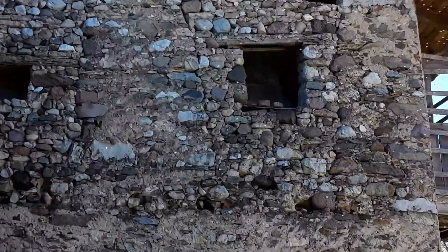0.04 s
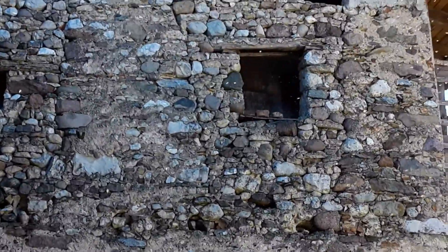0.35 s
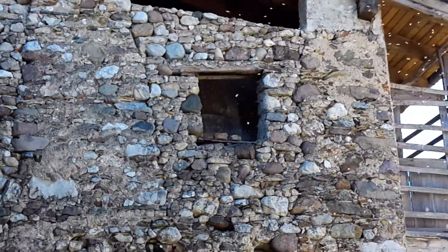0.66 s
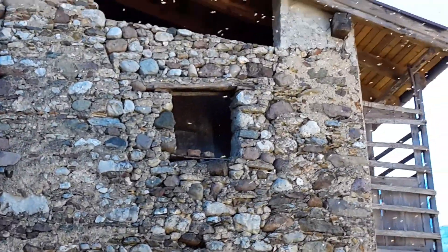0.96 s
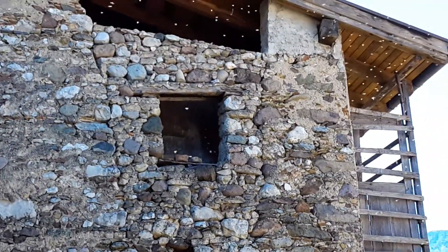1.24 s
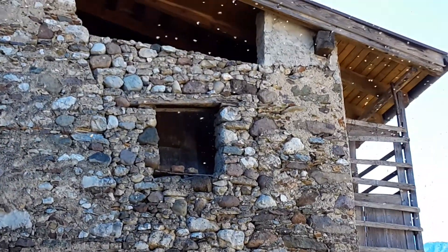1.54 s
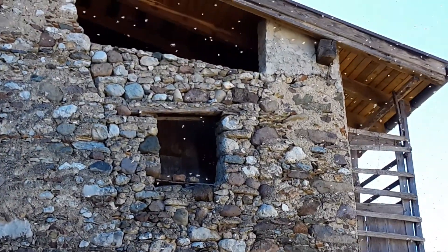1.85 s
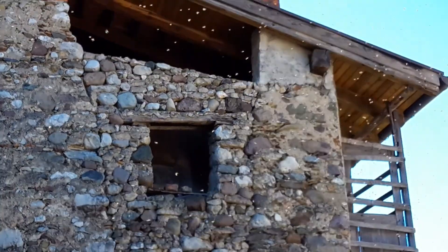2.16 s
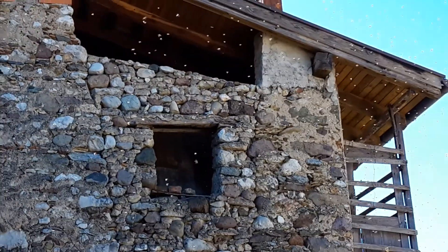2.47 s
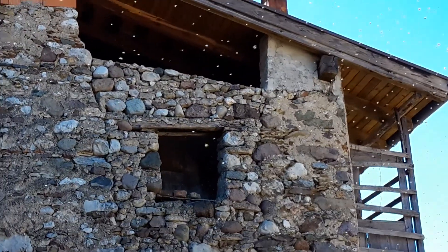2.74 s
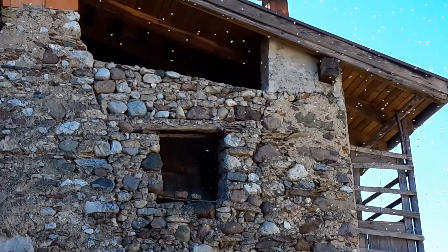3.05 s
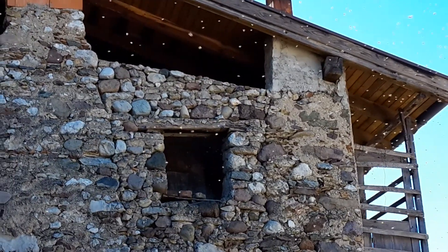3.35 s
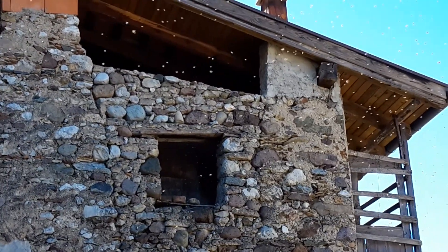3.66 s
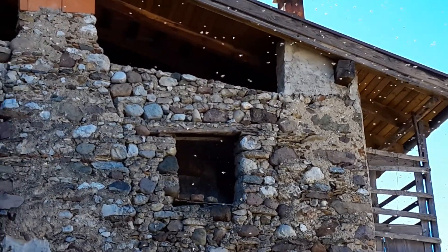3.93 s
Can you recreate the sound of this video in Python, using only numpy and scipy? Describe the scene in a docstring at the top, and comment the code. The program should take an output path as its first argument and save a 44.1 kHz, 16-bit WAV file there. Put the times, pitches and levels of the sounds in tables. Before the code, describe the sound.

Bees hum faintly throughout, mostly right, under steady outdoor hiss. Wind flutters and bumps on the microphone's left side until about 1.5 seconds, hardest near 0.5. Light handling knocks and dull rubs come around 2.1, 2.8 and 3.9 seconds, with sharp clicks on the right near 2.8 and 3.8. A faint distant tone sounds briefly at 2.4. One bee buzzes nearer, peaking around 3 seconds. Wind returns at the end.

```python
"""A swarm of bees hums under steady outdoor hiss, some way off and mostly to the right.
Their beating wings make the hum, under the eaves of a stone barn; late on, one bee drifts nearer.
Wind flutters and bumps on the left microphone port. Handling adds light knocks, dull rubs and a few
sharp clicks in the right port; the microphone's bass cut shapes bumps and handling alike.
Past the middle, a faint tone sounds briefly far off."""
import sys
import numpy as np
from scipy import signal
from scipy.fft import rfft, irfft
from scipy.io import wavfile
from scipy.ndimage import uniform_filter1d

SR = 44100
rng = np.random.default_rng(int(sys.argv[2]) if len(sys.argv) > 2 else 0)


def digitize_waveform(pressure):
    """Quantize a signal to 16-bit integers and store it at the path in sys.argv[1].

    Rows of a 2-D input are taken as channels; values are limited to [-1, 1].
    """
    field = np.atleast_2d(pressure).T
    bounded = np.clip(field, -1, 1)
    quanta = np.round(bounded * 32767).astype(np.int16)
    wavfile.write(sys.argv[1], SR, quanta)


N = 176400
TIME = np.arange(N) / SR


def undb(db):
    """Decibels to gain."""
    return 10 ** (np.asarray(db) / 20)


def curve(rows, column=1):
    """One column of a table, joined by straight lines in time."""
    rows = np.array(rows)
    return np.interp(TIME, rows[:, 0], rows[:, column])


def unit(x):
    """Scale to rms 1."""
    return x / np.std(x)


def cut(x, hz, kind, order=2):
    """Smooth low-, high- or band-pass."""
    return signal.sosfilt(signal.butter(order, hz, kind, fs=SR, output="sos"), x)


def drift(rate_hz):
    """Smooth random drift with spread 1."""
    steps = rng.standard_normal(400)
    hop = int(SR / rate_hz)
    ramps = np.interp(np.arange(N) / hop, np.arange(len(steps)), steps)
    return unit(uniform_filter1d(ramps, hop // 2 + 1))


def swell(at, width):
    """A bell-shaped rise and fall; width is its standard deviation in seconds."""
    return np.exp(-.5 * np.minimum(((TIME - at) / width) ** 2, 100))


def noise(spectrum):
    """Noise with a given density per Hz."""
    hz, db = np.array(spectrum).T
    bins_hz = np.maximum(np.arange(N // 2 + 1) * SR / N, 1)
    density = undb(np.interp(np.log(bins_hz), np.log(hz), db))
    return irfft(rfft(rng.standard_normal(N)) * density, N) * np.sqrt(SR / 2)


def bass_cut(pressure, corner_hz=94.3):
    """The microphone's bass cut turns a push into a short swing."""
    return cut(pressure, corner_hz, "high", order=3)


def pan(x, left_db=0, right_db=0):
    """Place a sound in stereo with a gain for each side."""
    return undb([[left_db], [right_db]]) * x


def wings(hz, harmonics_db):
    """One pair of wings repeats the same stroke at the beat rate, making a buzz."""
    cycle = np.linspace(0, 1, 513)
    stroke = sum(undb(db) * np.sin(2 * np.pi * (k * cycle + rng.random()))
                 for k, db in enumerate(harmonics_db, 1))
    return np.interp(np.cumsum(hz) / SR % 1, cycle, unit(stroke))


# Tone of a wingbeat, harmonics from the first up: level/dB
SWARM_HARMONICS = [-0.5, -4.5, -14, -13, -10.5, -25, -41.5, -21.5, -20, -37]
# Fader ride of the swarm: t/s, level/dB
SWARM_LEVEL = [(0, -59.5), (.6, -57), (1.2, -57), (1.6, -60.5), (2.2, -59.5), (2.8, -60), (3.3, -61),
               (4, -57)]


def swarm(count=24, wingbeat_hz=236.2, spread=.062, wander=.028, jitter=.014, swell_db=5.5):
    """Many bees blur into a hum, each with its own wandering pitch and loudness."""
    hum = 0
    for offset in unit(np.sinh(2 * np.linspace(-1, 1, count))):
        hz = wingbeat_hz * (1 + spread * offset + wander * drift(6) + jitter * drift(40))
        hum += wings(hz, SWARM_HARMONICS) * undb(swell_db * drift(6))
    return unit(hum) * undb(curve(SWARM_LEVEL))


# Flight of the nearer bee: t/s, wingbeat f/Hz, level/dB
NEAR_FLIGHT = [(0, 250, -75.5), (2.2, 240.3, -75), (2.5, 244, -64), (2.68, 247.9, -57.5),
               (2.8, 255.9, -55.5), (2.97, 249, -51.5), (3.12, 234.4, -64), (3.3, 251.7, -58),
               (3.45, 244, -65), (3.62, 238.4, -63), (4, 243, -59)]
# Tone of its wingbeat, harmonics from the first up: level/dB
NEAR_HARMONICS = [1.5, -7, -16.5, -21, -17, -22]


def near_bee(waver=.01, flutter_db=2.2):
    """One bee's wavering buzz rises out of the swarm as it drifts nearer."""
    hz = curve(NEAR_FLIGHT) * (1 + waver * drift(30))
    buzz = wings(hz, NEAR_HARMONICS)
    return buzz * undb(curve(NEAR_FLIGHT, column=2) + flutter_db * drift(8.4))


# Colour of the hiss at each port: f/Hz, density/dB per Hz
HISS_LEFT = [(30, -100), (200, -95), (340, -99.5), (850, -101.5), (2300, -105), (4500, -109), (6800, -115),
             (8700, -114.5), (10600, -109), (13000, -106.5), (16000, -106)]
HISS_RIGHT = [(25, -106), (60, -87), (120, -90), (190, -91.5), (400, -94.5), (850, -100), (1200, -99),
              (1600, -102), (3200, -105.5), (7000, -110), (8500, -105.5), (9500, -99), (10200, -92.5),
              (11000, -93), (12300, -99.5), (15500, -104.5)]
# Fader ride of the hiss: t/s, gain/dB
HISS_GAIN = [(0, 1.9), (.32, 0), (.47, 3), (.7, 4), (.92, 1.1), (1.03, 3.5), (1.17, 3.5), (1.35, 0.5),
             (1.47, 2), (1.65, 0), (2.5, -0.24), (2.9, 1.4), (3.2, 0.25), (3.78, -0.6), (3.88, 2.5), (4, 1)]


def hiss():
    """A bed of outdoor hiss, unrelated at the two ports and brighter on the right."""
    return np.array([noise(HISS_LEFT), noise(HISS_RIGHT)]) * undb(curve(HISS_GAIN))


# Gusts on the left port: t/s, level/dB
GUSTS = [(0, -50), (.11, -56.5), (.16, -47), (.22, -63), (.34, -54.5), (.4, -41), (.47, -44.5), (.53, -48),
         (.66, -38.5), (.73, -38.5), (.76, -63), (.81, -37.5), (.86, -52.5), (.95, -46.5), (1.03, -36),
         (1.14, -41.5), (1.22, -53.5), (1.27, -42), (1.33, -54), (1.42, -50), (1.52, -56.5), (3.8, -58.5),
         (3.9, -51.5), (4, -43)]
# Wind bumps: t/s, level before the bass cut/dB, width/ms
WIND_BUMPS = [(.405, -30.5, 0.93), (.457, -23, 2.54), (0.472, -9.5, 4.7), (0.487, -27, 1.25),
              (0.568, -27, 0.86), (0.622, -14, 2.27), (.631, -24.5, 1.24), (0.668, -19.5, 1.4),
              (0.694, -18.5, 1.33), (.790, -24, 1.5), (1.001, -22, 1.33), (1.0614, -16, 1.27),
              (1.130, -23, 1.63), (1.255, -27.5, 1.35), (1.405, -26.5, 0.79), (1.417, -23.5, 1.1),
              (1.444, -19, 1.2), (1.464, -28.5, 1.05), (1.646, -23.5, 1.01), (2.074, -22.5, 1.2),
              (2.149, -31.5, 0.68), (2.154, -23.5, 1.5), (2.811, -26, 0.65), (2.817, -22, 1.07),
              (3.865, -20.5, 0.91), (3.870, -22.5, 1.4)]


def wind(corner_hz=116, flicker_db=1.34):
    """Eddies flutter over the left port; the strongest tug at it as single bumps."""
    eddies = cut(rng.standard_normal(N), corner_hz, "low")
    eddies = cut(eddies, 253, "low", order=1)
    rumble = unit(cut(eddies, 39, "high"))
    flutter = rumble * undb(curve(GUSTS) + flicker_db * drift(29.86))
    suction = -sum(undb(db) * swell(at, ms / 1000) for at, db, ms in WIND_BUMPS)
    return pan(flutter + bass_cut(suction), right_db=-30)


# Knocks on the case: t/s, ring f/Hz, level/dB
CASE_KNOCKS = [(.4025, 394, -32), (2.0735, 580, -33), (2.817, 560, -38), (3.863, 524, -32)]


def knocks(decay_s=.0019):
    """Light knocks make the case ring for a cycle or two, next to the left port."""
    ring = 0
    for at, hz, db in CASE_KNOCKS:
        age = np.maximum(TIME - at, 0)
        ring += undb(db) * np.sin(2 * np.pi * hz * age) * np.exp(-age / decay_s)
    return pan(bass_cut(ring), right_db=-23)


# Finger rubs on the case: t/s, width/s, level/dB
FINGER_RUBS = [(2.077, 0.0018, -49), (2.15, 0.0036, -58.5), (2.818, 0.0088, -54), (3.876, 0.015, -57),
               (3.975, .04, -58)]


def rubs(corner_hz=420):
    """Fingers shift on the case with a dull rustle."""
    grip = sum(undb(db) * swell(at, width) for at, width, db in FINGER_RUBS)
    friction = cut(rng.standard_normal((2, N)), corner_hz, "low", order=1)
    return pan(unit(bass_cut(friction)) * grip, left_db=-5.5)


# A short, distant tone: t/s, f/Hz, width/s, level/dB
FAR_TONE = (2.37, 590, .04, -62)


def far_tone(waver=.004):
    """A faint pure tone swells and fades once, its pitch barely wavering."""
    at, hz, width, db = FAR_TONE
    phase = 2 * np.pi * np.cumsum(hz * (1 + waver * drift(24.6))) / SR
    return np.sin(phase) * swell(at, width) * undb(db)


# Handling clicks: t/s, level of the pressure step/dB
HANDLING_CLICKS = [(2.8334, -2.5), (3.8286, -2.5), (3.9209, -24)]


def clicks(rise_s=.00012, ring_hz=10500, ring_db=-3):
    """Each click is a sudden pressure step at the right port, with a tiny ring of its cavity."""
    steps, kicks = np.zeros((2, N))
    for at, db in HANDLING_CLICKS:
        steps += undb(db) * np.clip((TIME - at) / rise_s, 0, 1)
        kicks[int(at * SR)] += undb(db)
    ring = cut(kicks, [.85 * ring_hz, 1.3 * ring_hz], "band")
    return pan(bass_cut(steps) + undb(ring_db) * ring, left_db=-48)


def scene():
    """Bees and a far tone on the right, hiss all round, wind and handling on the microphone."""
    distant = pan(swarm() + near_bee() + far_tone(), left_db=-20.5)
    return distant + hiss() + wind() + knocks() + rubs() + clicks()


def record(dry):
    """The recorder cuts the top steeply above 15.9 kHz."""
    return signal.sosfilt(signal.ellip(10, .1, 70, 15900, fs=SR, output="sos"), dry)


dry = scene()
out = record(dry)
digitize_waveform(out)
```